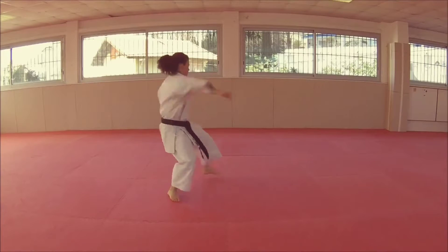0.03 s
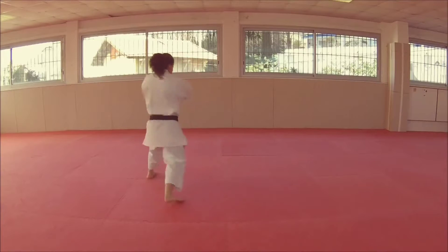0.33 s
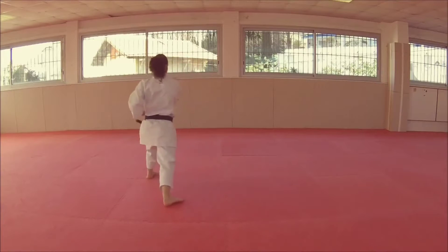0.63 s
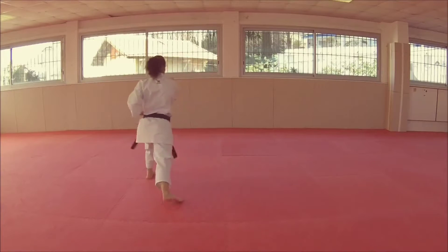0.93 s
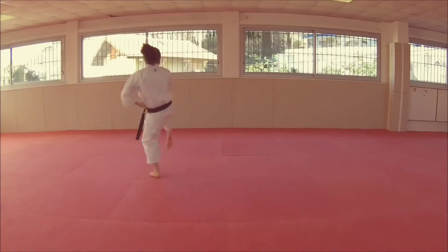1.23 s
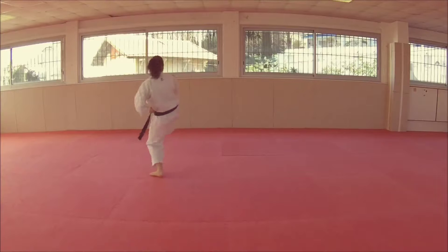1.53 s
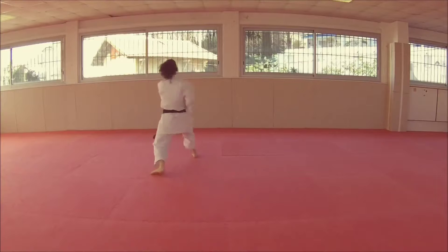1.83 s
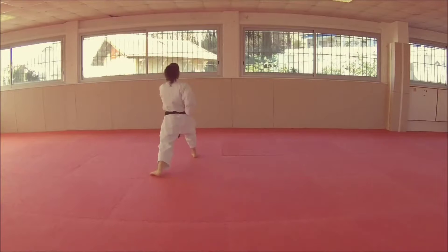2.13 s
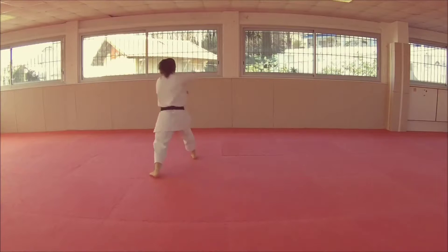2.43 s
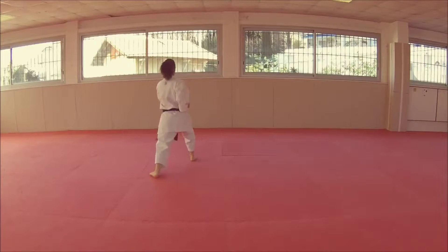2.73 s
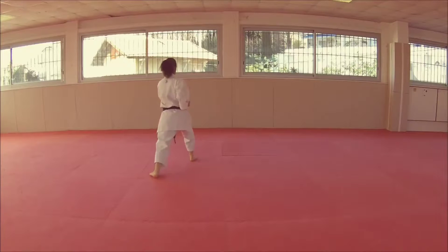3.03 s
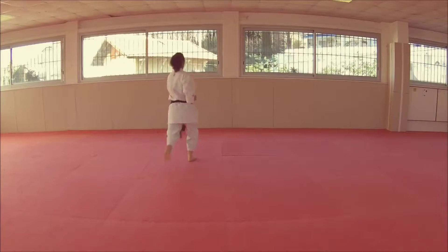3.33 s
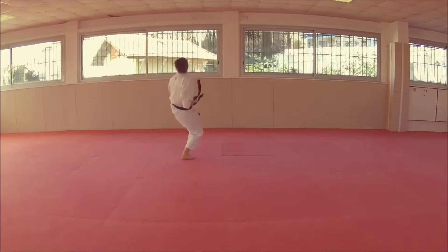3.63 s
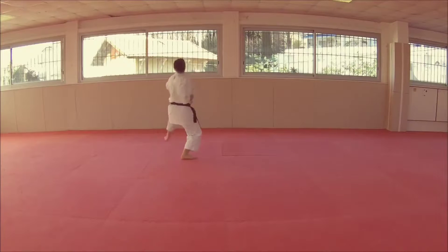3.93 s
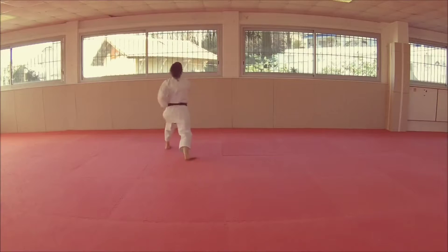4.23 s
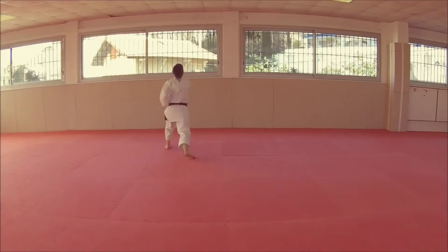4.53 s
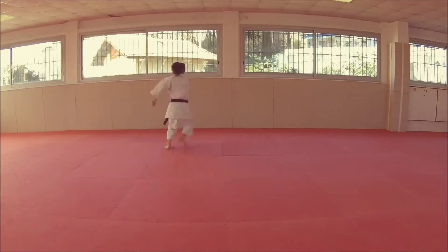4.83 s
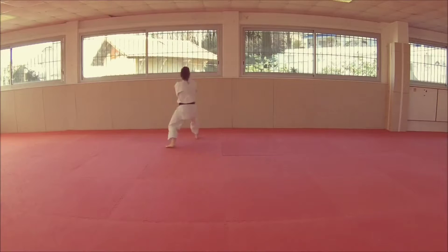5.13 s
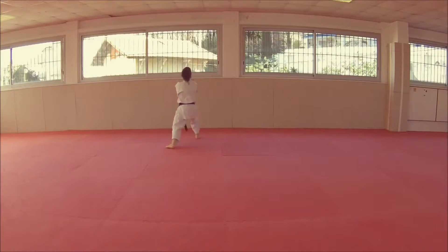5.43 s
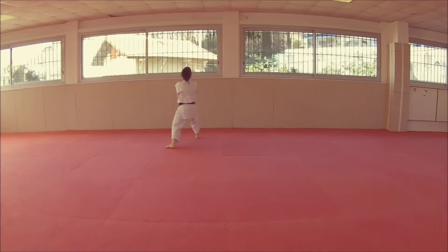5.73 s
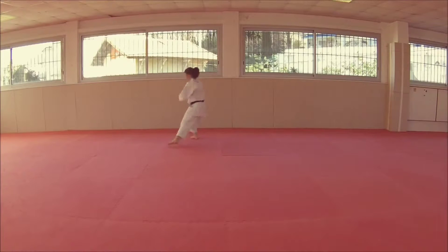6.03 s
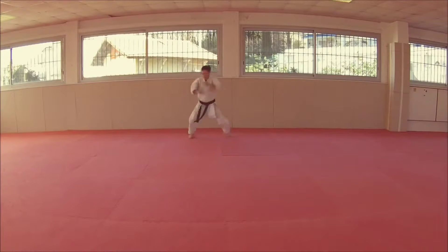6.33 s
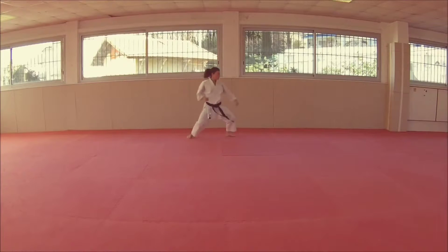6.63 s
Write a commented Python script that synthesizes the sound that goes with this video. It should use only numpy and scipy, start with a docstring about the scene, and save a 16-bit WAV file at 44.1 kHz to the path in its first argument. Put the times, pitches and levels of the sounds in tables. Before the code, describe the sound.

Someone practises karate in a large hall. The heavy cotton suit rustles through each turn and snaps taut at the end of each strike, starting with a sharp crack. Bare feet then slap down on a foam mat three times, with dull thuds and a low boom from the floor, and soles scuff softly in between. A last snap and step close the sequence. The sound is centred, with a short echo over a faint ventilation hum.

```python
"""A heavy cotton suit rustles and snaps taut: karate forms on a foam mat in a large hall.
Bare feet slap and stamp, the foam thuds and the floor booms beneath it. The cloth flaps and rubs
through each turn and cracks at the end of each strike; soles scuff and pivot.
The hall answers every move over a low ventilation hum."""
import sys
import numpy as np
from scipy import signal
from scipy.fft import rfft, irfft, next_fast_len
from scipy.io import wavfile
from scipy.ndimage import uniform_filter1d, map_coordinates

SR = 44100
rng = np.random.default_rng(int(sys.argv[2]) if len(sys.argv) > 2 else 0)


def to_wav(sig):
    """Store sig (one row per channel, or 1-D mono) as 16-bit WAV at the path in sys.argv[1].

    Samples outside -1..1 are clipped; the rate is SR.
    """
    pcm = np.clip(np.atleast_2d(sig), -1, 1) * 32767
    pcm = np.round(pcm).astype(np.int16)
    wavfile.write(sys.argv[1], SR, pcm.T)  # frames by channels


N = 299880

# The tone of skin on the mat. Each row: frequency in Hz, level in dB.
SKIN_EQ = [(60, -33.5), (250, 6.5), (600, 8), (1100, 10), (1600, 7.5), (2400, 4.5), (3500, -1), (4300, -7),
           (5500, -7.5), (8000, -17.5), (11000, -23.5), (14500, -48.5)]
# Each row: start in seconds, level in dB, decay in seconds, brightness in dB per octave,
# air pocket pitch in Hz, pop level in dB, hall send in dB.
FOOT_SLAPS = [(1.9461, -24, .006, 4, 2505, -17.5, -14), (1.9506, -23, 0.00615, 1.5, 3400, -10.5, 1),
              (1.955, -33, 0.009, 2, 5180, -18.5, -6), (4.1996, -37, 0.035, 5.5, 1410, -24, 3),
              (4.2037, -32.5, 0.034, 4, 1240, -25, 0), (4.2174, -43, 0.021, 2, 1100, -28, 12),
              (5.184, -40.5, 0.011, 7.5, 5170, -37, 7), (5.1871, -30.5, 0.076, -1.5, 1050, -35, -1),
              (5.1936, -47, 0.02, 5, 5380, -28, 1), (5.2002, -40, 0.022, 5, 1460, -36, 6)]

def foot_slaps():
    """A bare foot cracks on the mat in sharp pulses a few milliseconds apart; trapped air pops."""
    out, t = np.zeros(N), np.arange(SR // 4) / SR
    pop_peak_s = 0.0008
    pop_shape = (t / pop_peak_s * np.exp(1 - t / pop_peak_s)) ** 2
    for start, db, decay, tilt_db, pocket_hz, pop_db, wet_db in FOOT_SLAPS:
        eq = voiced(SKIN_EQ, tilt_db, pocket_hz, octaves=1.0)
        add(out, start, contact(skin_crack(decay), eq, db, wet_db))
        add(out, start, amp(pop_db) * pop_shape * np.sin(2 * np.pi * pocket_hz * t))
    return out

def skin_crack(decay):
    """One sharp pulse, falling 60 dB in decay seconds."""
    t = np.arange(SR // 4) / SR
    return rng.choice([-1, 1], len(t)) * amp(-60 * t / decay) * (1 - np.exp(-t / 0.0004))

# The dull body of the foam. Each row: frequency in Hz, level in dB.
FOAM_EQ = [(15, -20), (40, 5.5), (80, 4.5), (130, -5.5), (180, -6.5), (240, -6), (320, -6.5), (380, -18),
           (700, -22.5), (2000, -44), (6000, -100)]
# Each row: start in seconds, thud level in dB, pitch in Hz, first and second mode levels in dB.
MAT_THUDS = [(0.368, -53, 115, -29, -44), (0.406, -40.5, 81, -28, -51), (1.947, -28.5, 196.5, -31, -42),
             (1.974, -35.5, 130, -17, -30), (2.555, -47.5, 142, -48, -34), (4.2, -35, 263, -38, -52),
             (4.203, -32.5, 130, -18, -16.5), (4.238, -37.5, 126, -17, -39), (4.267, -32.5, 82.4, -18, -37),
             (4.302, -41.5, 127, -16.5, -34), (5.185, -35, 266, -33, -45), (5.197, -31, 126.3, -13, -21),
             (5.212, -33, 228, -26, -43), (5.253, -32.5, 138, -20, -26), (6.234, -51.5, 198, -37.5, -41),
             (6.513, -36.5, 132, -34, -29.5), (6.57, -39, 91.5, -29, -35)]

def mat_thuds():
    """Weight drops onto the foam, which thuds and rings briefly in two modes."""
    out, t = np.zeros(N), np.arange(SR // 4) / SR
    overtone_ratio, attack_s, decay_s = 1.7, 0.0016, 0.12
    envelope = (1 - np.exp(-t / attack_s)) * amp(-60 * t / decay_s)
    for start, db, pitch_hz, low_db, high_db in MAT_THUDS:
        eq = voiced(FOAM_EQ, 0, pitch_hz, octaves=0.64)
        add(out, start, contact(np.ones(1), eq, db, wet_db=9.0))
        phase = 2 * np.pi * pitch_hz * t
        ring = amp(low_db) * np.sin(phase) - amp(high_db) * np.sin(overtone_ratio * phase)
        add(out, start, ring * envelope)
    return out

# The floor's low end. Each row: pitch in Hz, relative level in dB, seconds to fall 60 dB.
FLOOR_MODES = [(27.08, 9, 2.13), (30.9, -16, 1.9), (47.57, 1, 1.5), (58.7, 0, 2.8), (81.9, -13.5, 3.2)]
# Each row: start in seconds, boom gain in dB, pat level in dB, pat pitch in Hz.
STAMPS = [(.355, -57, -43, 900), (1.947, -38.5, -25.5, 2710), (2.544, -46, -59, 700),
          (4.204, -28.5, -31.5, 1090), (5.195, -33.5, -35, 1330), (6.232, -59, -51, 590),
          (6.505, -41, -41.5, 915)]

def stamps():
    """A step lands: the flat of the sole pats down and the floor swings on beneath it."""
    out, t = np.zeros(N), np.arange(2 * SR) / SR
    pat_lag_s, pat_decay_s, boom_swell_s = 0.004, 0.17, 0.065
    boom = sum(amp(db - 60 * t / t60) * np.sin(2 * np.pi * hz * t) for hz, db, t60 in FLOOR_MODES)
    boom *= 1 - np.exp(-t / boom_swell_s)
    for start, boom_db, pat_db, pat_hz in STAMPS:
        eq = voiced(SKIN_EQ, -2.0, pat_hz, octaves=3.3)
        add(out, start + pat_lag_s, contact(skin_crack(pat_decay_s), eq, pat_db, wet_db=6.5))
        add(out, start, amp(boom_db) * boom)
    return out

# The tone of cracking cotton. Each row: frequency in Hz, level in dB.
COTTON_EQ = [(40, -31.5), (150, -12), (280, -4), (400, -2), (580, 1), (1100, 0.5), (1600, -3), (2400, -4.5),
             (3400, -5.5), (4300, -16), (5500, -10.5), (8000, -25), (11000, -31), (14500, -61)]
# Each row: start in seconds, crack level in dB, swell and decay in seconds,
# brightness in dB per octave, fold resonance in Hz, flutter level in dB, hall send in dB.
SUIT_SNAPS = [(.338, -31, 0.025, 0.12, -1.5, 700, -36, 5), (.519, -24.5, 0.012, .03, -3, 950, -26.5, 2.5),
              (2.541, -34, .009, 0.1, .5, 910, -50, 0), (2.684, -34, 0.018, 0.17, 1, 1090, -40, 1),
              (4.252, -30, .018, 0.034, 0, 600, -41, 0.5),
              (4.271, -33, 0.0088, 0.065, 2.5, 1540, -41.5, -2),
              (4.984, -35.5, .03, 0.11, -1.5, 590, -40, 2.5), (6.540, -28, 0.0086, .09, 0.5, 780, -37, 3.5),
              (6.556, -27.5, 0.0037, 0.077, -1.5, 1840, -37, -1)]

def suit_snaps():
    """The suit whips taut in a clump of cracks, then shakes itself out in a brighter flutter."""
    out, t = np.zeros(N), np.arange(SR // 3) / SR

    def clump(swell, decay):
        """Uneven cracks that swell and die; times in seconds."""
        shape = np.minimum(t / swell, 1) ** 2 * amp(-60 * np.maximum(t - swell, 0) / decay)
        return shape * crackle(len(t))
    for start, db, swell, decay, tilt_db, fold_hz, flutter_db, wet_db in SUIT_SNAPS:
        crack_eq = voiced(COTTON_EQ, tilt_db, fold_hz, octaves=1.0)
        add(out, start, contact(clump(swell, decay), crack_eq, db, wet_db))
        flutter_eq = voiced(COTTON_EQ, tilt_db + 2.5, fold_hz, octaves=3.3)
        flutter = clump(swell=0.021, decay=0.27)
        add(out, start + swell, contact(flutter, flutter_eq, flutter_db, wet_db=2.0))
    return out

# Each row: start in seconds, level in dB, decay in seconds, pitch in Hz, width in octaves.
TICKS = [(.034, -56, 0.03, 1710, 0.5), (.116, -53, 0.031, 1220, 0.6), (.497, -38, 0.16, 875, 0.45),
         (.527, -25.5, 0.037, 580, 0.34), (.546, -39, 0.046, 5250, 0.38), (.579, -30.5, 0.039, 680, 0.95),
         (1.029, -59, 0.084, 2200, 1.5), (1.1409, -46, 0.037, 1730, 0.41), (1.173, -50.5, 0.09, 3400, 0.37),
         (1.193, -60, 0.037, 5000, 1.3), (1.304, -43.5, 0.02, 895, 0.4), (1.315, -50, 0.065, 2800, 0.59),
         (1.318, -50.5, .06, 476, 0.46), (1.352, -69, 0.04, 1100, 1.5), (1.466, -46, 0.087, 2000, 0.98),
         (1.524, -46.5, 0.04, 750, 0.36), (1.731, -55, 0.0046, 2100, 0.69),
         (1.736, -48.5, 0.0051, 3000, 0.49), (1.764, -63, 0.011, 5470, 0.64),
         (1.784, -52, 0.036, 2630, 0.69), (1.858, -63, 0.028, 6000, 1.1), (1.918, -46, 0.037, 717, 0.83),
         (1.92, -68, .03, 7000, .7), (2.561, -37, .03, 470, 0.33), (2.706, -42, .08, 2200, .25),
         (3.386, -51, 0.12, 3000, 0.42), (3.441, -54, 0.021, 3500, 1.7), (3.695, -56, .04, 6400, 1.2),
         (3.498, -51, 0.086, 982, 0.42), (3.73, -46, 0.035, 680, 0.27), (3.765, -45.5, 0.1, 680, 0.14),
         (3.929, -55, 0.057, 1280, 0.61), (3.972, -62, .025, 2200, 1.3), (4.006, -50.5, 0.034, 3200, 1.3),
         (4.038, -63, 0.017, 4020, 1.2), (4.068, -50.5, 0.029, 2330, 0.79),
         (4.144, -54.5, 0.032, 3500, 0.83), (4.208, -30.5, 0.046, 1140, 0.2),
         (4.298, -35.5, .03, 650, 0.94), (4.997, -44, .12, 2400, 0.8), (5.032, -53, 0.034, 5000, 0.68),
         (5.175, -40, 0.045, 910, 0.67), (5.199, -35.5, 0.047, 1180, .5), (6.056, -63.5, 0.02, 4480, .5),
         (6.126, -49, 0.033, 1880, 1.2), (6.129, -51, 0.075, 5040, 0.11), (6.143, -45, 0.096, 2300, 0.5),
         (6.147, -52, 0.064, 4900, 0.22), (6.234, -46.5, 0.045, 600, 0.44), (6.559, -32, 0.028, 990, 0.68)]

def ticks(rows):
    """Creases, hollow flaps, toe taps and short rubs: each is a grainy puff in one resonance."""
    out, t = np.zeros(N), np.arange(SR // 4) / SR
    for start, db, decay, pitch_hz, octaves in rows:
        envelope = (1 - np.exp(-t / (0.1105 * decay))) * amp(-60 * t / decay)
        eq = lambda hz: 20 * np.log10(bell(hz, pitch_hz, octaves)) - 3 * (hz / 5000) ** 2
        add(out, start, contact(envelope * crackle(len(t)), eq, db, wet_db=-3))
    return out

# The tones of low flapping and bright rubbing. Each row: frequency in Hz, level in dB.
FLAP_EQ = [(40, -52), (120, 5.5), (240, 2.5), (380, 2.5), (700, -0.5), (1100, -5), (1700, -23),
           (4000, -55.5)]
RUB_EQ = [(500, -25.5), (1200, 8), (2000, 7), (3300, 6.5), (5500, -4.5), (8000, -9), (14000, -32.5)]
# Each row: start, swell and hold in seconds, then flap and rub levels in dB before their trims.
LIMB_SWINGS = [(0.019, 0.019, 0.079, -51, -47.5), (0.112, 0.054, 0.15, -44, -51),
               (0.318, 0.019, 0.22, -41.5, -46), (1.105, 0.041, 0.18, -53.5, -55),
               (1.206, .12, .05, -49, -52.5), (1.407, 0.062, 0.089, -48, -50.5),
               (1.553, 0.025, 0.25, -59.5, -60), (1.782, 0.1, 0.16, -51, -50),
               (2.396, 0.13, 0.022, -51, -52), (2.549, 0.051, 0.13, -43.5, -43.5),
               (3.372, 0.012, 0.074, -56, -52), (3.438, 0.027, 0.23, -51, -52),
               (3.715, 0.023, 0.098, -49.5, -53), (3.936, 0.037, 0.22, -53, -54),
               (4.529, 0.029, 0.41, -64, -60.5), (4.85, 0.14, 0.24, -49, -52.5),
               (5.908, .15, 0.082, -69, -63), (6.119, 0.024, 0.026, -47, -45.5),
               (6.226, 0.037, 0.11, -45, -53.5), (6.387, 0.021, 0.075, -48, -51)]

def suit_rustle():
    """A swinging arm or leg flaps the suit and rubs cloth on cloth."""
    t = np.arange(N) / SR
    swings = [amp([[flap_db], [rub_db]]) * stroke(t - start, swell, hold, fade_db_per_s=142)
              for start, swell, hold, flap_db, rub_db in LIMB_SWINGS]
    flap_level, rub_level = np.max(swings, axis=0)
    flap = flap_level * friction(FLAP_EQ, grain_db=1.0, grains_per_s=73, patchy_db=2.0)
    rub = rub_level * friction(RUB_EQ, grain_db=1.5, grains_per_s=260, patchy_db=4.5)
    return amp(-2.0) * flap + amp(-5.5) * rub

def creases():
    """Up to six small folds give way at random in each swing; returns rows for ticks()."""
    per_s, decay_s, centre_hz, octaves = 16, 0.017, 3200, 0.8
    rows = []
    for start, swell, hold, _, rub_db in LIMB_SWINGS:
        count = round(per_s * (swell + hold))
        for when, size, pitch in rng.uniform(-1.1, 1, (6, 3))[:count]:
            onset = start + swell + hold * abs(when)
            rows.append((onset, rub_db - 8 + 2.5 * size, decay_s, centre_hz * 1.6 ** pitch, octaves))
    return rows

# One gliding gesture. Each row: time in seconds, level in dB, low and high resonance in Hz.
SLEEVE_GLIDE = [(2.57, -43.5, 722, 3110), (2.619, -53, 849, 3480), (2.669, -45.5, 982, 3670),
                (2.711, -50, 892, 3580), (2.745, -41.5, 770, 3230), (2.779, -58, 693, 3120)]

def sleeve_swish():
    """A sleeve drags along the jacket: two resonances rise and fall with the arm's speed."""
    t = np.arange(N) / SR
    times, db, low_hz, high_hz = np.transpose(SLEEVE_GLIDE)

    def band(pitch_hz, width_hz):
        """Narrow noise around a gliding pitch."""
        phase = 2 * np.pi * np.cumsum(np.interp(t, times, pitch_hz)) / SR
        return unit(wobble(width_hz, N) * np.sin(phase) + wobble(width_hz, N) * np.cos(phase))
    level = np.interp(t, times, amp(db), left=0, right=0)
    return level * (band(low_hz, width_hz=230) + amp(-7.5) * band(high_hz, width_hz=360))

# The thin hiss of a scuff. Each row: frequency in Hz, level in dB.
SOLE_EQ = [(1500, -5.5), (4000, 6.5), (6000, 9), (8000, -0.5), (10500, 0), (12500, -11), (14500, -33.5)]
# Each row: start, swell and hold in seconds, then level in dB before the trim.
SOLE_SCUFFS = [(-0.003, 0.024, 0.1, -61), (0.323, 0.06, 0.079, -52), (0.51, 0.026, 0.047, -45),
               (1.15, 0.048, 0.0086, -53), (1.3, .015, 0.029, -50.5), (1.35, 0.044, 0.049, -53.5),
               (2.533, 0.11, 0.049, -44), (3.21, 0.11, 0.0088, -64), (3.41, 0.023, 0.027, -55.5),
               (3.57, .11, 0.0087, -55), (4.102, 0.048, .01, -60), (4.801, 0.031, 0.029, -55.5),
               (5.959, 0.058, 0.12, -66), (6.185, 0.11, 0.085, -59), (6.403, 0.067, 0.16, -51)]

def sole_scuffs():
    """Bare soles catch and slip as they slide or pivot on the mat."""
    t = np.arange(N) / SR
    level = np.max([amp(db) * stroke(t - start, swell, hold, fade_db_per_s=221)
                    for start, swell, hold, db in SOLE_SCUFFS], axis=0)
    return amp(-5.0) * level * friction(SOLE_EQ, grain_db=2, grains_per_s=450, patchy_db=2.5)

# The tone of the reverb. Each row: frequency in Hz, level in dB.
HALL_EQ = [(100, 3), (1200, 0.5), (1650, -5.5), (2300, 1), (3450, 0.5), (3900, -1.5), (4600, -2.5),
           (5300, 5), (6500, 2.5), (10500, 5.5), (13500, 7)]
# Its length. Each row: frequency in Hz, seconds to fall 60 dB.
HALL_DECAY = [(40, 1.35), (100, 0.99), (200, 0.63), (450, 0.65), (1100, 0.49), (2800, 0.61), (5500, 0.65),
              (8000, 0.44), (13000, 0.22)]

def hall():
    """A fresh echo of energy 1: a few near reflections and a diffuse tail whose top dies first."""
    hz, t, spectra = signal.stft(rng.standard_normal(3 * SR // 2), SR, nperseg=256)
    gain_db = along(HALL_EQ, hz)[:, None] - 60 * t / along(HALL_DECAY, hz)[:, None]
    tail = signal.istft(spectra * amp(gain_db), SR, nperseg=256)[1]
    tail *= 1 - 0.47 * np.exp(-np.arange(len(tail)) / SR / 0.02)  # builds as the far walls answer
    tail /= np.linalg.norm(tail)
    early = rng.integers(SR // 125, SR // 20, size=8)  # ceiling and walls, 8 to 50 ms late
    tail[early] += amp(-18.5) * rng.choice([-1, 1], len(early))
    return tail / np.linalg.norm(tail)

# The bed of air, then the hum's partials. Each row: frequency in Hz, level in dB.
AIR_EQ = [(12, -52), (20, -4.5), (55, -6), (88, -9.5), (133, -21.5), (217, -23.5), (286, -23), (408, -35),
          (455, -31.5), (725, -34), (1040, -35.5), (1520, -39.5), (1950, -37), (4550, -45.5), (10600, -56),
          (14000, -77.5)]
HUM_PARTIALS = [(86.1, -51), (263.8, -70), (285.3, -75.5)]

def room_tone():
    """Still air with a wavering ventilation hum."""
    t = np.arange(N) / SR
    air = amp(-51.0) * toned(rng.standard_normal(N), AIR_EQ)
    hum = sum(amp(db + 2.2 * wobble(4.8, N)) * np.sin(2 * np.pi * hz * t + 0.21 * wobble(15.0, N))
              for hz, db in HUM_PARTIALS)
    return air + hum

def crackle(size, grain_db=3.5, grains_per_s=1200):
    """Noise that comes in tiny jerks, by default those of stiff cloth giving way."""
    return rng.standard_normal(size) * amp(grain_db * wobble(grains_per_s, size))

def friction(curve, grain_db, grains_per_s, patchy_db):
    """Tiny catches and slips at rms 1, their colour shifting in random patches."""
    spectra = signal.stft(crackle(N, grain_db, grains_per_s), nperseg=512)[2]
    patches = uniform_filter1d(rng.standard_normal(spectra.shape), size=4, axis=0)
    patches = uniform_filter1d(patches, size=6, axis=1)
    grains = signal.istft(spectra * amp(patchy_db * unit(patches)), nperseg=512)[1][:N]
    return toned(grains, curve)

def stroke(t, swell, hold, fade_db_per_s):
    """A movement gathers speed, keeps it, then dies away."""
    return np.clip(t / swell, 0, 1) * amp(-fade_db_per_s * np.maximum(t - swell - hold, 0))

def contact(burst, eq, db, wet_db):
    """A burst and its hall tail through one EQ; db is the dry energy spread over 10 ms."""
    burst = np.pad(burst / np.linalg.norm(burst), (0, SR * 3 // 2 - len(burst)))
    tail = hall()[:len(burst)] * np.sqrt(np.cumsum(burst ** 2))
    eq_power = np.mean(amp(eq(np.linspace(0, SR / 2, 2048))) ** 2)
    return amp(db) * np.sqrt(SR / 100 / eq_power) * coloured(burst + amp(wet_db) * tail, eq)

def with_hall(x, wet_db):
    """A whole track plus its reverb."""
    return x + amp(wet_db) * signal.fftconvolve(x, hall())[:N]

def voiced(curve, tilt_db, peak_hz, octaves):
    """An EQ: the curve tilted by tilt_db an octave, with an 8 dB resonance at peak_hz."""
    tilt = lambda hz: tilt_db * np.log2(np.maximum(hz, 200) / 1000)
    return lambda hz: along(curve, hz) + tilt(hz) + 8 * bell(hz, peak_hz, octaves)

def bell(hz, peak_hz, octaves):
    """A bump of height 1 that halves this many octaves from its peak."""
    return 1 / (1 + (np.log2((hz + 1) / peak_hz) / octaves) ** 2)

def coloured(x, eq):
    """x through a causal filter with a gain of eq(hz) dB."""
    size = 2 * next_fast_len(len(x) // 2 + 4096)
    gain = np.maximum(amp(eq(np.fft.rfftfreq(size, 1 / SR))), 1e-6)
    cepstrum = irfft(np.log(gain))
    cepstrum[1:size // 2] *= 2  # folded for minimum phase: no ring before a hit
    cepstrum[size // 2 + 1:] = 0
    return irfft(rfft(x, size) * np.exp(rfft(cepstrum)), size)[:len(x)]

def toned(x, curve):
    """x shaped by a (Hz, dB) curve, at rms 1."""
    return unit(coloured(x, lambda hz: along(curve, hz)))

def along(curve, hz):
    """(Hz, value) points read on a log axis."""
    knots_hz, values = np.transpose(curve)
    return np.interp(np.log(hz + 1), np.log(knots_hz + 1), values)

def wobble(rate, size):
    """A smooth random curve with rate knots a second."""
    knots = rng.standard_normal(size // 8)
    return map_coordinates(knots, [np.arange(size) * rate / SR], mode="wrap")

def amp(db):
    """Decibels to gain."""
    return 10 ** (np.asarray(db) / 20)

def unit(x):
    """x at rms 1."""
    return x / np.sqrt(np.mean(x ** 2) + 1e-20)

def add(track, start, x):
    """Mix x into the track at start seconds."""
    part = track[max(round(start * SR), 0):][:len(x)]
    part += x[:len(part)]

def scene():
    """Feet, suit and room, all dead centre."""
    hits = foot_slaps() + mat_thuds() + stamps() + suit_snaps() + ticks(TICKS + creases())
    movement = with_hall(suit_rustle() + sole_scuffs(), wet_db=-4.0)
    sleeve = with_hall(sleeve_swish(), wet_db=-5.5)
    mono = hits + movement + sleeve + room_tone()
    return np.array([mono, mono])

# The tone of the hiss. Each row: frequency in Hz, level in dB.
HISS_EQ = [(100, 14), (6000, 8.5), (10000, 8), (12000, -2), (14000, -6)]

def record(dry):
    """Round off the hardest peaks, add a faint hiss and cut the very top."""
    ceiling, top_hz = 0.6, 14300
    rounded = dry / (1 + np.abs(dry / ceiling) ** 6) ** (1 / 6)
    hiss = amp(-85.0) * np.array([toned(noise, HISS_EQ) for noise in rng.standard_normal(dry.shape)])
    size = next_fast_len(N + SR // 2)
    passband = np.fft.rfftfreq(size, 1 / SR) < top_hz
    return irfft(rfft(rounded + hiss, size) * passband, size)[:, :N]

dry = scene()
out = record(dry)
to_wav(out)
```